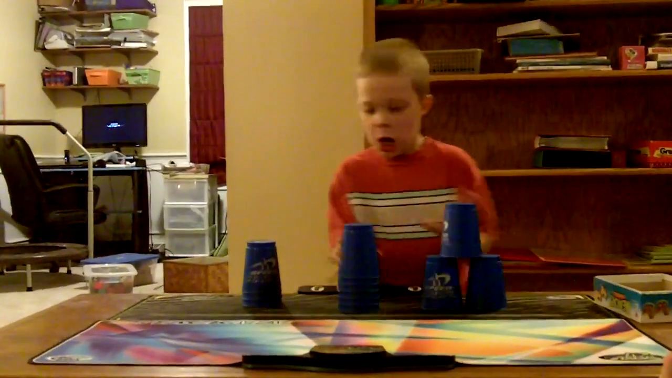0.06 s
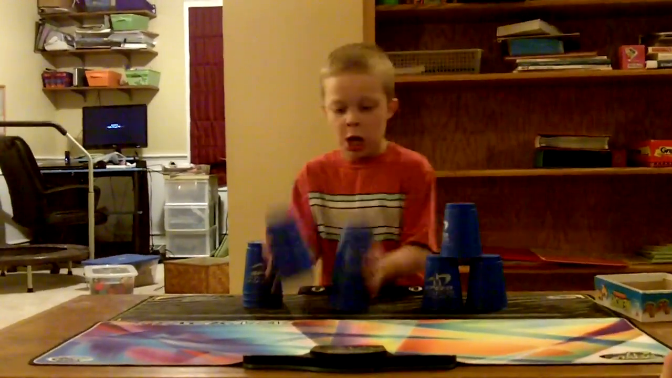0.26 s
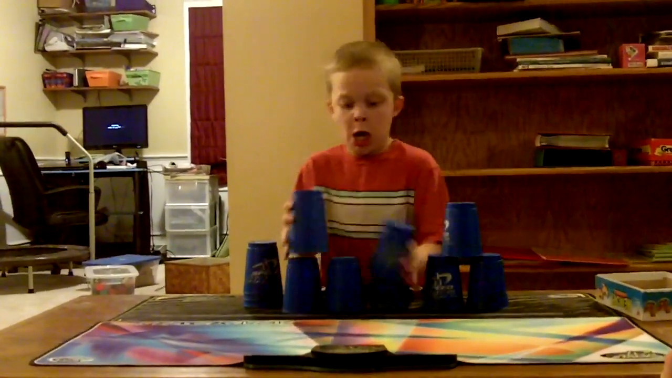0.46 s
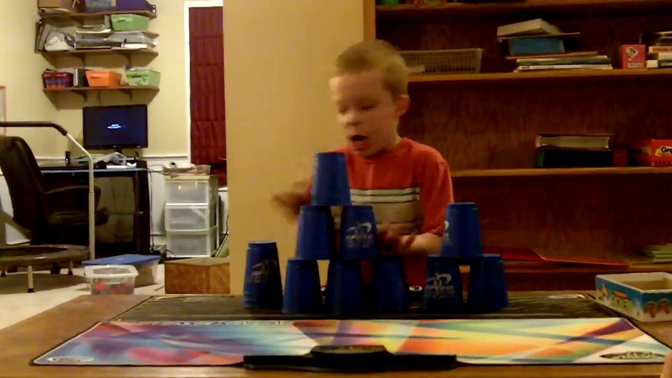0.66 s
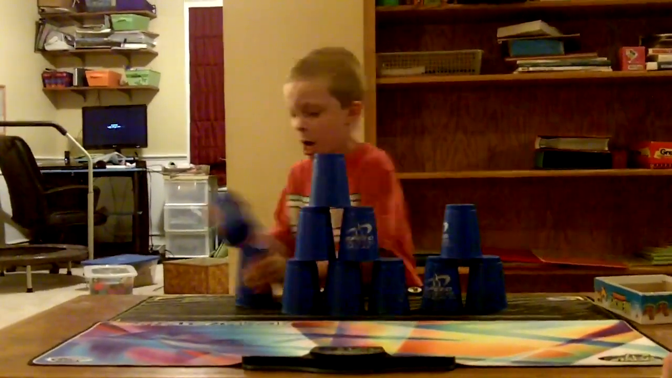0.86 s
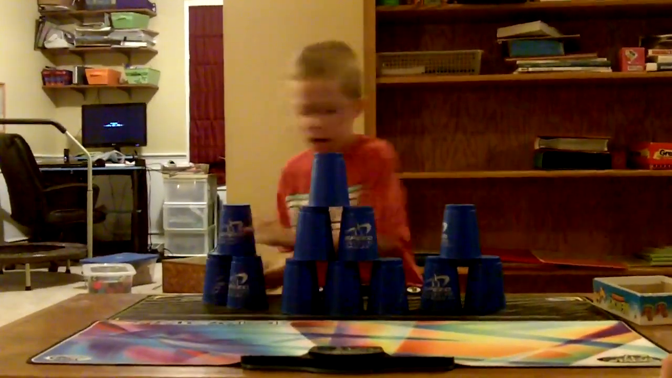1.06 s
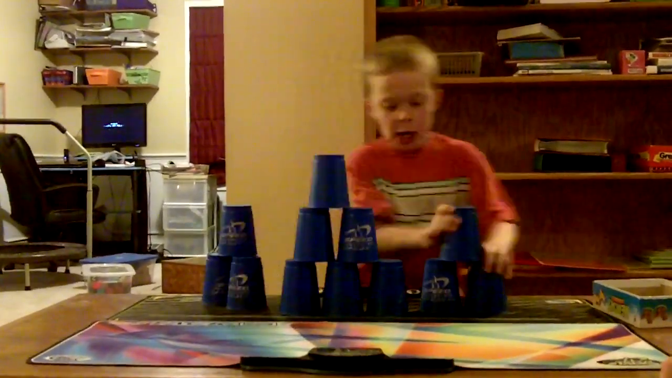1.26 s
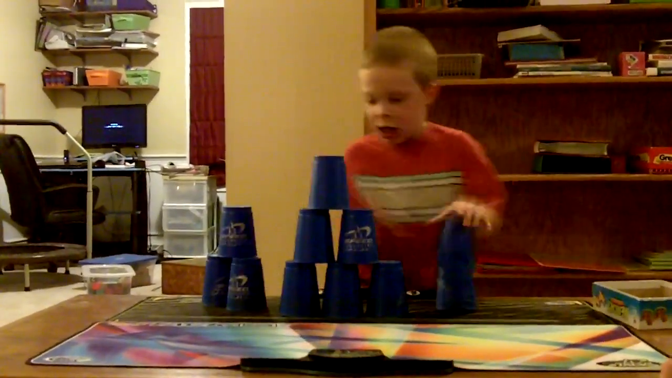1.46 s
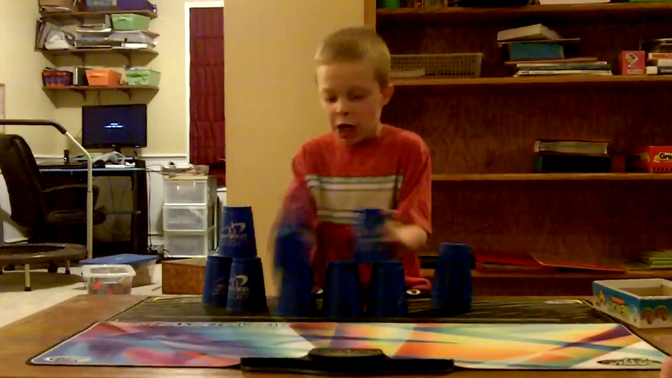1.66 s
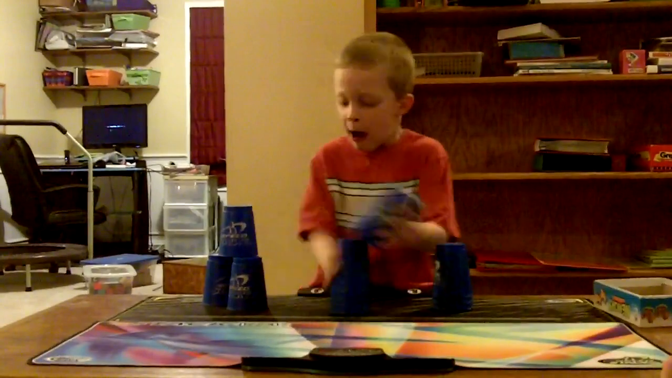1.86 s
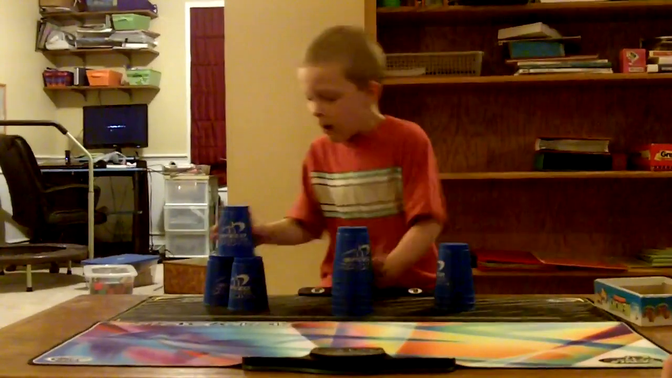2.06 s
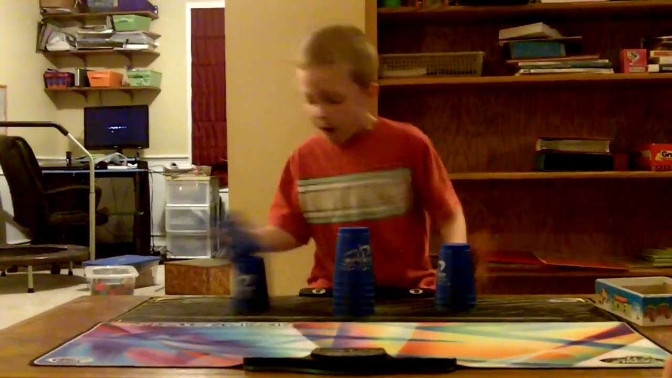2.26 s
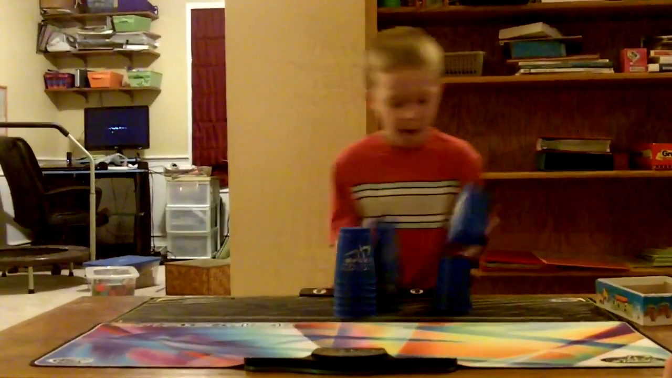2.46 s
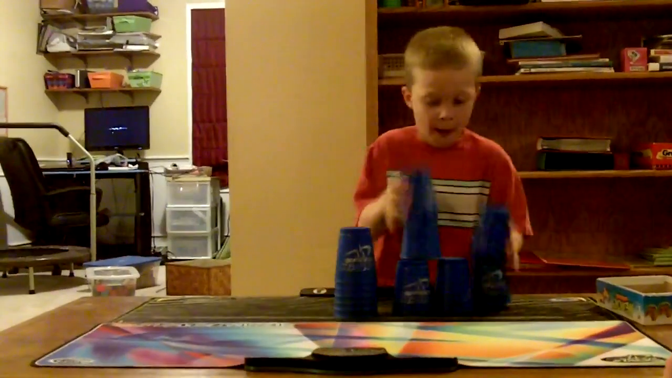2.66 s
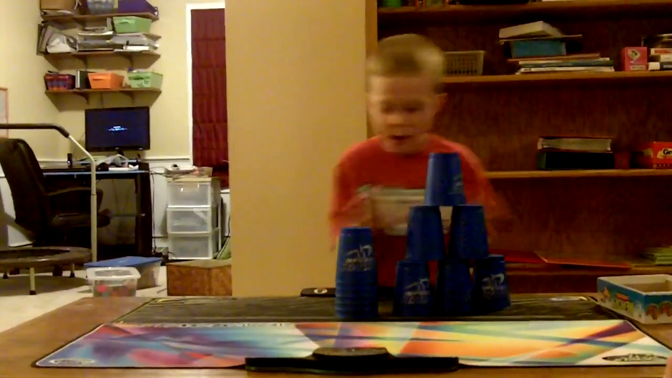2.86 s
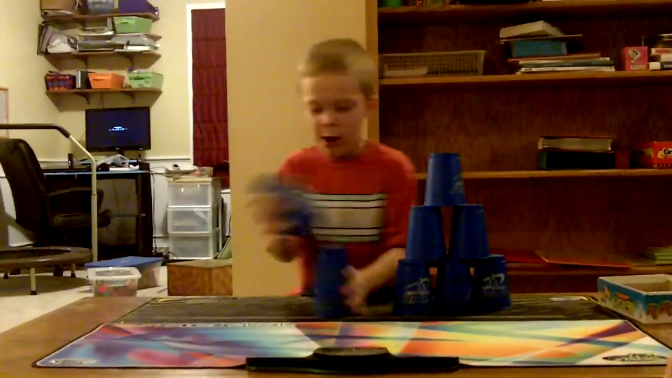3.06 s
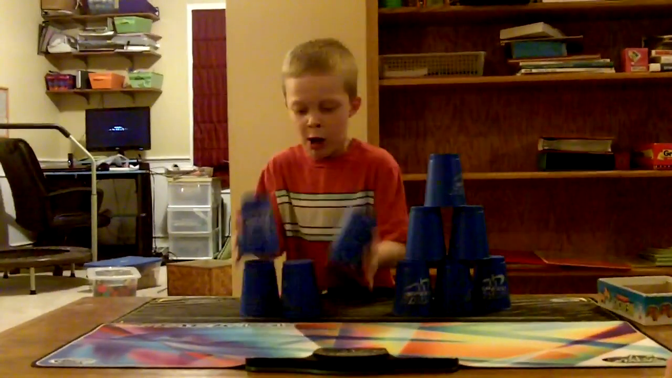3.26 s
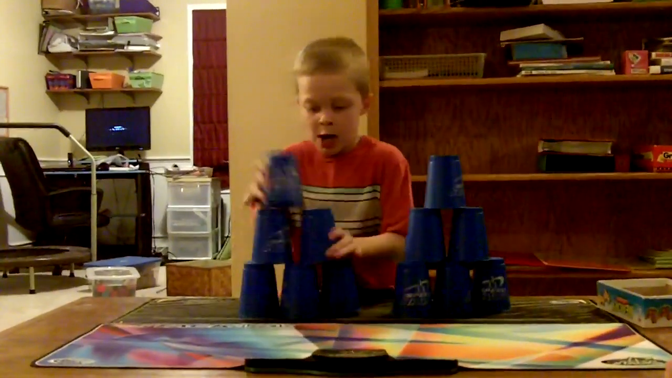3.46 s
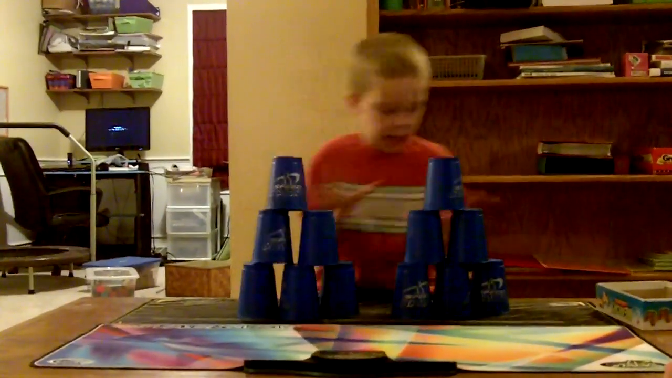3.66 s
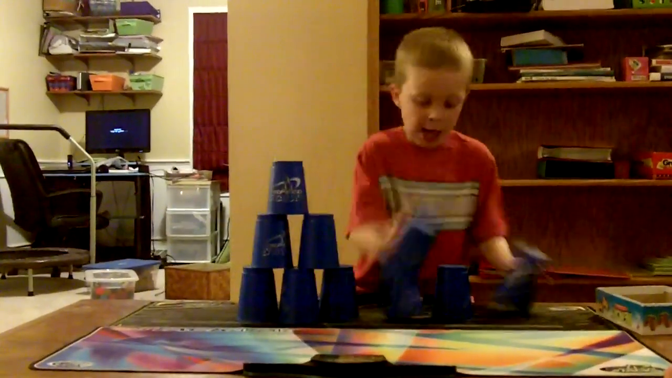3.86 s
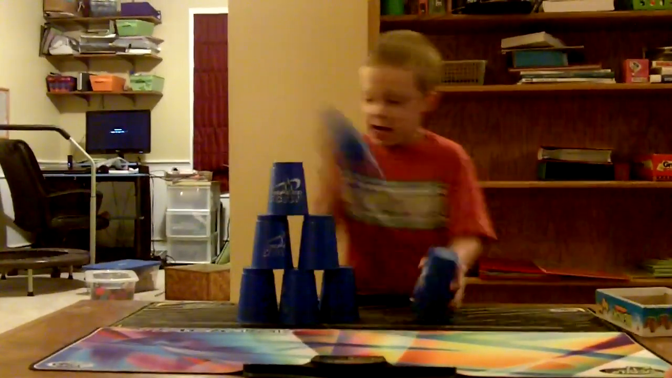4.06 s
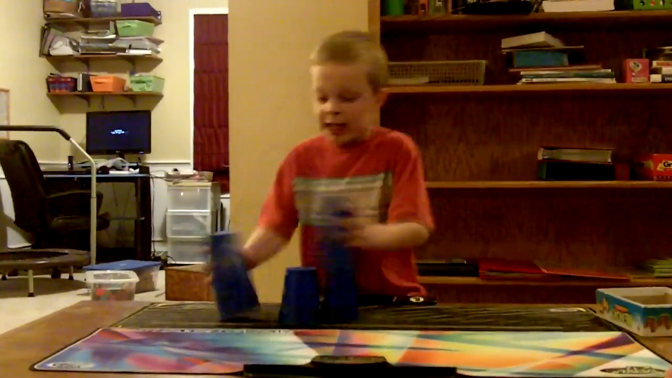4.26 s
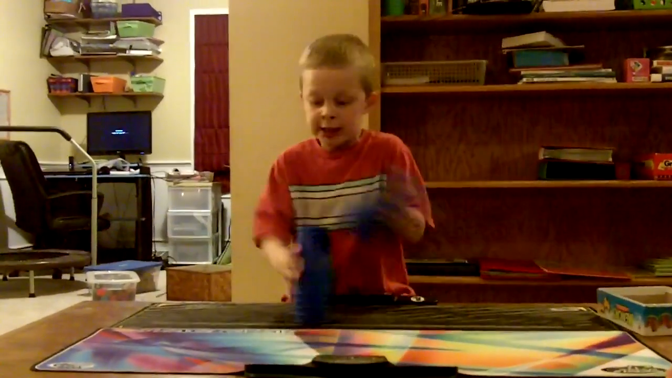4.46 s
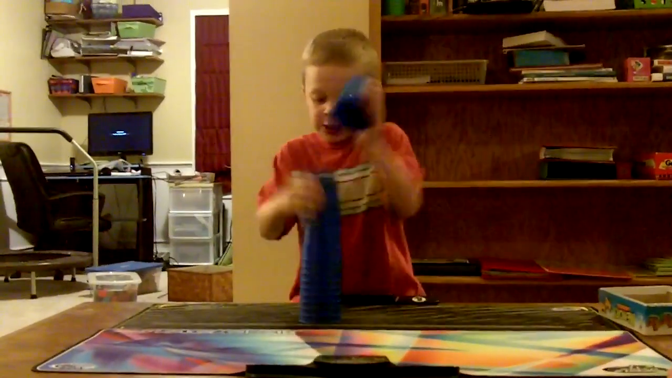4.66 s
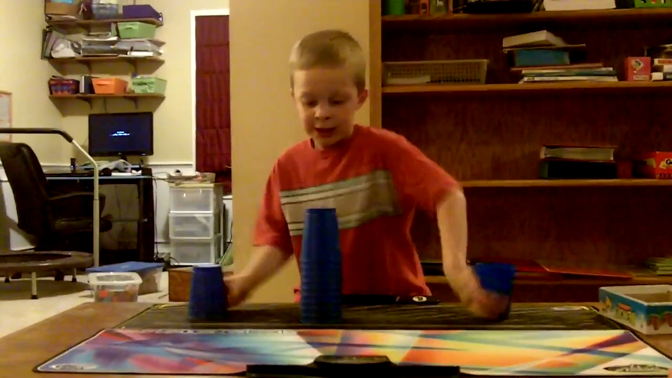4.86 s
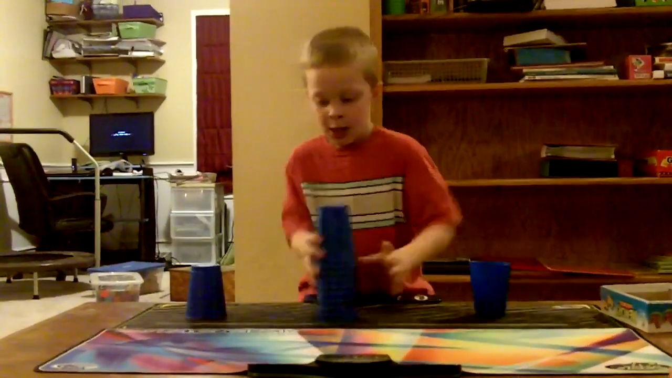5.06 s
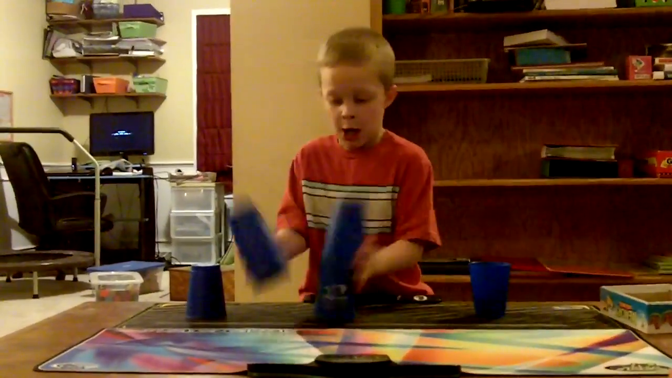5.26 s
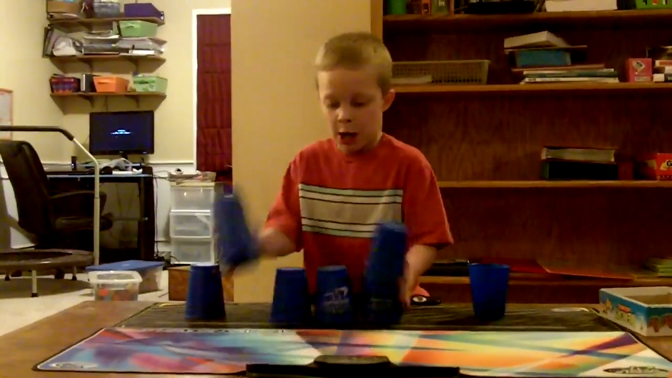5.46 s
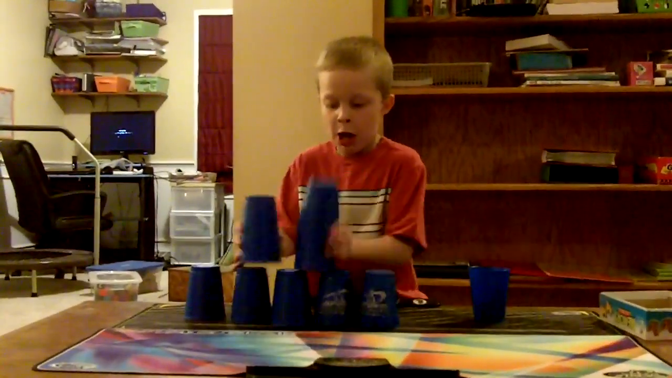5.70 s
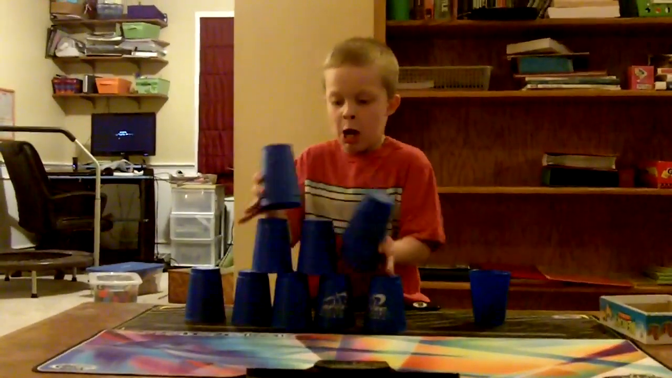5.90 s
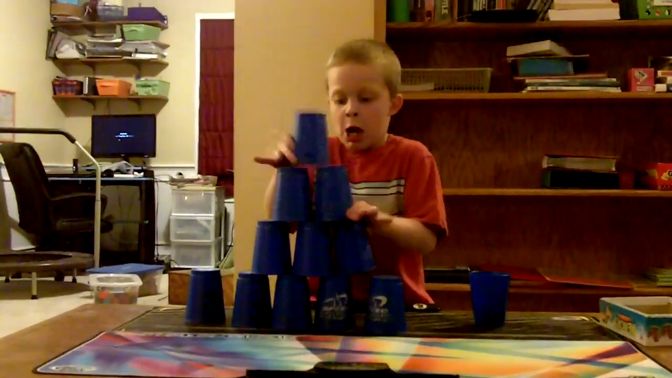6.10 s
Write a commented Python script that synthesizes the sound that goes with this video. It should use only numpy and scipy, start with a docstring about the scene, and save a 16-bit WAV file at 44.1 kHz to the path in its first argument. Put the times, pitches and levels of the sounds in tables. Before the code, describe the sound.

Hollow plastic cups are stacked and collapsed at great speed on a matted wooden table, clacking, tapping and rasping in a small room.

```python
"""Plastic sport cups are stacked into pyramids and swept back into piles at speed, on a mat on a wooden table.
Cups land on the mat, tap on each other and nest; each contact mixes hollow ring, table knock, wall clack and rim tick.
Cups rasp as they slide into each other, rims graze, whole piles thump the mat and fingers rattle faintly.
The small room adds a near echo and a short tail; a mono camera on the same table picks up its slow rocking."""
import sys
import numpy as np
from scipy import signal
from scipy.fft import rfft, irfft
from scipy.io import wavfile
from scipy.ndimage import uniform_filter1d

SR = 44100
rng = np.random.default_rng(int(sys.argv[2]) if len(sys.argv) > 2 else 0)


def to_wav(s):
    """Save 16-bit WAV."""
    ch = np.atleast_2d(s).T  # columns
    pcm = np.round(np.clip(ch, -1, 1) * 32767)  # PCM
    wavfile.write(sys.argv[1], SR, pcm.astype(np.int16))


N = 270482
SIZE = 16384  # samples in one short sound
T = np.arange(SIZE) / SR
HZ = np.fft.rfftfreq(SIZE, 1 / SR)

# Modes of the table top. Each row: frequency in Hz, width in Hz, relative level in dB.
TABLE_MODES = [(138.4, 17.2, -0.5), (223.6, 13, 0), (287, 133, -7), (432.7, 61, -3), (564, 88, -5.5)]
# Colour of the air ringing in a cup. Each row: frequency in Hz, relative level in dB.
HOLLOW_COLOUR = [(150, -4.5), (420, 2), (720, 2), (1300, 1), (2000, -17.5), (4000, -3.5), (12000, -91)]
# Colour of the bending cup wall. Each row: frequency in Hz, relative level in dB.
WALL_COLOUR = [(400, -22), (1100, 4.5), (2000, -6), (2200, -1), (3200, -11.5), (4500, -24), (14000, -77.5)]
# Colour of the stiff rim. Each row: frequency in Hz, relative level in dB.
RIM_COLOUR = [(800, -12.5), (2500, 1.5), (5400, -10), (6600, 0), (7400, 2.5), (8800, -6.5), (11000, -17.5),
              (14000, -30.5), (16000, -47)]
WALL_HZ = 1840  # the bending wall, when it does not lead


def amp(db):
    """Decibels to gain."""
    return 10 ** (np.asarray(db) / 20)


def unit(x):
    """x at rms 1."""
    return x / np.sqrt(np.mean(x ** 2) + 1e-20)


def along(points, hz):
    """(Hz, value) points read on a log frequency axis."""
    point_hz, values = np.transpose(points)
    return np.interp(np.log(hz + 1), np.log(point_hz + 1), values)


def causal(points):
    """Minimum-phase response with the gains of (Hz, dB) points, by folding the cepstrum forward in time."""
    cepstrum = irfft(np.log(amp(along(points, HZ))))
    cepstrum[1:SIZE // 2] *= 2
    cepstrum[SIZE // 2 + 1:] = 0
    return np.exp(rfft(cepstrum))


def resonance(hz, width_hz, f=HZ):
    """Response of one damped mode, with gain 1 at its peak."""
    damping = 1j * f * width_hz
    return damping / (hz * hz - f * f + damping)


def modes(rows):
    """Summed response of (Hz, width Hz, dB) modes."""
    return sum(amp(db) * resonance(hz, width) for hz, width, db in rows)


def noise(points):
    """Steady noise of rms 1, coloured by (Hz, dB) points."""
    gains = amp(along(points, np.fft.rfftfreq(N, 1 / SR)))
    return unit(irfft(rfft(rng.standard_normal(N)) * gains, N))


def add(track, s, sound):
    """Mix a sound in at time s."""
    part = track[max(round(s * SR), 0):][:len(sound)]
    part += sound[:len(part)]


def burst(spectrum, db):
    """The sound of a spectrum, with the energy of 40 ms at this rms level."""
    sound = irfft(spectrum)
    return amp(db) * sound / np.linalg.norm(sound) * np.sqrt(.04 * SR)


def blow(chatter, t60):
    """Spectrum of a contact force: one sharp push, then brief decaying chatter of the plastic."""
    force = rng.standard_normal(SIZE) * amp(-60 * T / t60)
    force *= chatter / np.linalg.norm(force)
    force[0] = 1
    return rfft(force)


def room(wet_db=-1, echo_db=-8, echo_s=0.0083, build_s=0.0018):
    """Response from one spot on the table: direct sound, a near wall, and a diffuse tail duller as it dies."""
    # How fast the small room dies away. Each row: frequency in Hz, time to fall 60 dB in seconds.
    decay = [(150, .36), (1000, 0.3), (7300, 0.19), (14000, 0.15)]
    hz, t, cells = signal.stft(rng.standard_normal(SIZE), SR, nperseg=256)
    cells = cells * amp(-60 * t / along(decay, hz)[:, None])
    tail = signal.istft(cells, SR, nperseg=256)[1][:SIZE]
    tail *= np.sqrt(2 * np.log(1000) / (SR * decay[1][1]))  # near unit energy, by the decay at 1 kHz
    tail *= 1 - np.exp(-(T / build_s) ** 2)
    delay = echo_s * (1 + rng.standard_normal() / 10)  # the path to the wall varies with the spot
    echo = amp(echo_db) * np.exp(-2j * np.pi * HZ * delay)
    return 1 + echo + amp(wet_db) * rfft(tail)


def background():
    """Steady faint room air, and low rumble that follows the rocking of the table under the camera."""
    # Rocking of the table. Each row: time in seconds, level in dB.
    rocking = [(0, -33.5), (0.9, -38.5), (1.5, -32.5), (2.4, -34), (2.9, -35), (3.8, -40), (4.5, -30.5),
               (5.6, -40.5)]
    # Colour of the room air. Each row: frequency in Hz, relative level in dB.
    air_colour = [(60, 12.5), (250, 3.5), (750, 0.5), (1500, -9.5), (4000, -24), (7500, -21), (13000, -36),
                  (16000, -56)]
    # Colour of the rocking. Each row: frequency in Hz, relative level in dB.
    sway_colour = [(5, -16), (14, 8.5), (27, -6.5), (40, -4.5), (600, -103)]
    rocking_db = np.interp(np.arange(N) / SR, *np.transpose(rocking))
    return amp(-46.0) * noise(air_colour) + amp(rocking_db) * noise(sway_colour)


def fingers(blows):
    """Fingers never leave the cups: faint touches and rattles, stronger around the blows and fading in the pauses."""
    busy_s, busy_grows = 0.083, 0.47  # span averaged (s); dB of handling per dB of the blows
    touches = (rng.random(N) < 160 / SR) * rng.standard_normal(N)  # about 160 a second
    plastic = causal(RIM_COLOUR) + amp(5.5) * causal(HOLLOW_COLOUR) + amp(-1) * causal(WALL_COLOUR)
    touch = irfft(blow(chatter=5.3, t60=0.029) * plastic * room())
    power = np.abs(uniform_filter1d(blows ** 2, int(busy_s * SR)))
    busy = power ** (busy_grows / 2)
    return amp(-47.5) * unit(signal.fftconvolve(touches * busy, touch)[:N])


def contact(s, level_db, cavity_hz, wall_hz, ring_db, knock_db, clack_db, tick_db):
    """One contact excites four things at once: the air in the cups, the table, the bending wall and the rim."""
    # Loose cups that ring in sympathy. Each row: frequency in Hz, width in Hz, relative level in dB.
    loose = [(682, 95, 4.5), (870, 31, -7), (1396, 74, -0.5)]
    knock_grows = 0.65  # dB of table knock per dB of contact: the mat cushions hard blows
    track, chance = np.zeros(N), rng.random(3)
    upper_hz = cavity_hz * (1.22 + 0.62 * chance[0])
    cavity = resonance(cavity_hz, 109) - amp(-10.0) * resonance(upper_hz, 180)
    # the grip of the hand shifts the wall's upper mode
    bending = resonance(wall_hz, 300) - amp(-14) * resonance(2400 + 1000 * chance[1], 1020)
    hollow = causal(HOLLOW_COLOUR) * (1 + modes(loose))
    wall, rim = causal(WALL_COLOUR), causal(RIM_COLOUR)
    # a light blow, softened by the mat
    table = modes(TABLE_MODES) * causal([(100, -13.5), (450, -1), (4000, -44.5)])
    space = room()

    ring = blow(chatter=1.0, t60=0.042) * cavity * hollow * space
    knock = blow(chatter=0.78, t60=0.018) * table * space
    clack = blow(chatter=1.14, t60=0.011) * bending * wall * space
    tick = blow(chatter=2, t60=.007) * rim * space
    add(track, s, burst(ring, level_db + ring_db))
    add(track, s, burst(knock, knock_grows * level_db + knock_db))
    add(track, s, burst(clack, level_db + clack_db))
    add(track, s, burst(tick, level_db + tick_db))

    # a tilted cup scuffs with one edge 5 to 10 ms before it seats
    scuff = blow(chatter=12, t60=0.055) * space
    lead_s = .005 * (1 + chance[2])
    add(track, s - lead_s, burst(scuff * rim, level_db + tick_db - 36))
    add(track, s - lead_s, burst(scuff * wall, level_db + clack_db - 18.5))
    return track


def landings():
    """The mat takes the first edge with a dull knock; the rim follows with a brighter tick."""
    # Cups set down on the mat. Each row: time of the first edge in seconds, hollow pitch in Hz,
    # contact level of the landing in dB, contact level of the seating rim in dB.
    cups_down = [(0.024, 710, -26, -54), (0.44, 760, -26, -27.5), (0.598, 720, -32, -28),
                 (1.103, 775, -18.5, -31.5), (1.37, 826, -35.5, -63), (1.408, 857, -21.5, -43),
                 (1.703, 840, -37, -58), (2.036, 870, -29, -45), (2.201, 885, -39.5, -60),
                 (2.633, 664, -40.5, -53), (2.664, 646, -40, -65.5), (2.772, 804, -27, -26),
                 (3.331, 783, -25.5, -35), (3.484, 740, -29.5, -27.5), (3.806, 890, -35.5, -43.5),
                 (3.946, 830, -24, -34), (4.067, 1200, -33.5, -37), (4.962, 713, -18.5, -43),
                 (5.454, 740, -45, -76), (5.491, 730, -35, -49), (5.586, 650, -28, -33.5),
                 (5.713, 750, -34.5, -36), (6.096, 1060, -34, -41.5)]
    seat_s = 0.012  # from the first edge to the whole rim
    track = np.zeros(N)
    for s, hz, landing_db, seating_db in cups_down:
        track += contact(s, landing_db, hz, WALL_HZ, ring_db=-0.5, knock_db=-11, clack_db=-27, tick_db=-20.5)
        track += contact(s + seat_s, seating_db, hz, WALL_HZ,
                         ring_db=1, knock_db=-10, clack_db=-13, tick_db=-4.5)
    return track


def taps():
    """Cup on cup: the hollow ring leads, under a crisp edge."""
    # Cups tapping on other cups. Each row: time in seconds, hollow pitch in Hz, contact level in dB.
    cup_taps = [(0.0797, 890, -13), (0.667, 756, -23), (0.711, 743, -19.5), (0.734, 915, -17),
                (1.135, 943, -17.5), (1.151, 930, -25), (1.387, 886, -24), (1.575, 740, -30.5),
                (1.762, 826, -29), (2.247, 910, -34.5), (2.411, 820, -25.5), (2.472, 650, -29),
                (2.888, 874, -15.5), (2.912, 1000, -20.5), (3.523, 865, -25.5), (3.583, 950, -19),
                (3.614, 910, -19.5), (3.907, 900, -23.5), (3.972, 840, -22.5), (4.175, 790, -31.5),
                (4.209, 1160, -23), (4.303, 744, -21), (4.389, 950, -22.5), (4.553, 725, -33.5),
                (4.644, 685, -32.5), (4.754, 800, -36), (4.9598, 765, -15.5), (4.965, 815, -18),
                (5.815, 745, -18), (5.887, 1073, -26.5), (5.975, 980, -32.5), (6.053, 780, -25.5)]
    track = np.zeros(N)
    for s, hz, db in cup_taps:
        track += contact(s, db, hz, WALL_HZ, ring_db=0.5, knock_db=-16.0, clack_db=-13, tick_db=-12.5)
    return track


def slides():
    """Nested walls stick and slip: dense tiny catches rasp and stir the air between the cups."""
    # Cups sliding into a pile. Each row: start in seconds, end in seconds,
    # level in dB of the hollow rub over the slide, before the room.
    pile_slides = [(0.306, 0.34, -36.5), (1.382, 1.514, -33.5), (1.749, 1.877, -30.5),
                   (1.905, 2.044, -37.5), (2.252, 2.302, -35.5), (2.431, 2.569, -42), (3.885, 3.965, -31.5),
                   (3.951, 4.011, -23.5), (4.298, 4.417, -29), (4.401, 4.492, -38), (4.561, 4.676, -40.5),
                   (4.689, 4.837, -51), (5.83, 5.955, -41)]
    rasp_db = -5.5  # rasp of the walls against the hollow rub
    swell, release = 0.33, 0.28  # exponents: friction builds as the cups wedge, then lets go
    track = np.zeros(N)
    cavity = (resonance(810, 470) + 0.29) * causal(HOLLOW_COLOUR)
    plastic = causal(RIM_COLOUR) + amp(3.5) * causal(WALL_COLOUR)
    for start, end, db in pile_slides:
        progress = np.minimum(T / (end - start), 1)
        grip = progress ** swell * (1 - progress) ** release
        # about 520 catches a second: many tiny, a few sharp
        catches = rng.laplace(size=SIZE) * (rng.random(SIZE) < 520 / SR)
        force = rfft(grip * catches)
        rub, rasp = unit(irfft(force * cavity)), unit(irfft(force * plastic))
        sound = amp(db) * (rub + amp(rasp_db) * rasp)
        share = (end - start) * SR / SIZE  # keeps the level over the slide, however short
        add(track, start, irfft(rfft(sound) * room()) * np.sqrt(share))
    return track


def nests():
    """Wall against wall: a light catch, then the snap; the clack leads and little air is left to ring."""
    # Cups snapping home inside another, or pulled free. Each row: time of the snap in seconds,
    # wall pitch in Hz, contact level in dB.
    snaps = [(0.335, 1450, -25.5), (0.989, 1840, -30), (1.489, 1810, -21.5), (1.629, 2800, -25),
             (1.72, 1210, -34.5), (1.801, 1840, -32.5), (1.822, 1690, -35), (1.881, 1770, -22.5),
             (2.007, 1880, -24), (2.085, 2920, -32), (2.093, 1300, -26.5), (2.352, 1900, -31.5),
             (2.495, 1230, -32), (3.18, 1720, -24), (3.432, 1730, -35), (4.017, 1860, -21),
             (4.317, 1800, -36), (4.378, 1880, -25.5), (4.511, 1590, -41), (4.599, 1580, -31.5),
             (5.164, 1740, -40), (5.28, 1430, -39.5)]
    cavity_hz = 834  # the air in a cup, when it does not lead
    catch_s = .005  # the cup catches once this long before it snaps
    track = np.zeros(N)
    for s, hz, db in snaps:
        track += contact(s - catch_s, db, cavity_hz, hz,
                         ring_db=-15.5, knock_db=-24.5, clack_db=-16.5, tick_db=-20)
        track += contact(s, db, cavity_hz, hz, ring_db=-3.0, knock_db=-19, clack_db=0.5, tick_db=-7)
    return track


def grazes():
    """Light touches excite only the stiff rim."""
    # Rims grazing a neighbour without ringing it. Each row: time in seconds, level in dB.
    rim_touches = [(0.926, -46), (1.461, -33), (1.596, -35.5), (1.789, -29), (2.432, -37), (4.016, -22.5),
                   (4.357, -37), (5.684, -42)]
    track, rim = np.zeros(N), causal(RIM_COLOUR)
    for s, db in rim_touches:
        add(track, s, burst(blow(chatter=1, t60=0.023) * rim * room(), db))
    return track


def thumps():
    """A heavy pile pushes slowly, so only the table's lowest modes answer."""
    # Whole piles landing on the mat. Each row: time in seconds, level in dB.
    piles_down = [(1.389, -33), (2.007, -27.5), (2.095, -31.5), (3.18, -25), (4.391, -22), (4.597, -23.5),
                  (4.961, -26), (5.285, -38)]
    slow_push = causal([(50, -3.5), (230, 4.5), (400, -18.5), (2000, -91)])
    track, table = np.zeros(N), modes(TABLE_MODES) * slow_push
    for s, db in piles_down:
        add(track, s, burst(table * room(), db))
    return track


def scene():
    """All the cups, the hands and the room reach one microphone, which feeds both channels."""
    blows = landings() + taps() + nests()
    mono = background() + fingers(blows) + blows + slides() + grazes() + thumps()
    return np.array([mono, mono])


def record(dry):
    """The camera has a deep notch in the treble, rounds off the loudest peaks and keeps nothing above its band limit."""
    top_hz = 16200
    f = np.fft.rfftfreq(N + SIZE, 1 / SR)
    notched = irfft(rfft(dry, N + SIZE) * (1 - resonance(5460, 1460, f)), N + SIZE)
    rounded = notched / (1 + notched ** 6) ** (1 / 6)
    return irfft(rfft(rounded) * (f < top_hz), N + SIZE)[:, :N]


dry = scene()
out = record(dry)
to_wav(out)
```